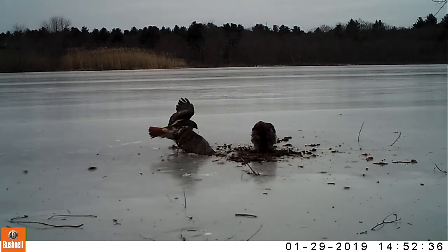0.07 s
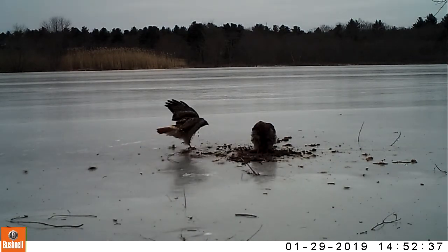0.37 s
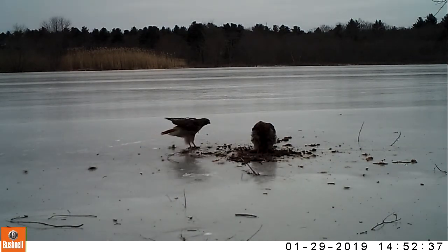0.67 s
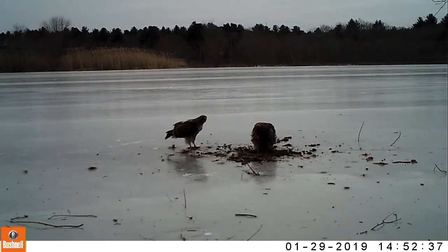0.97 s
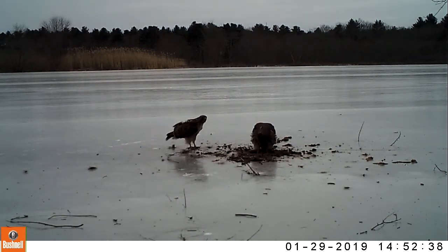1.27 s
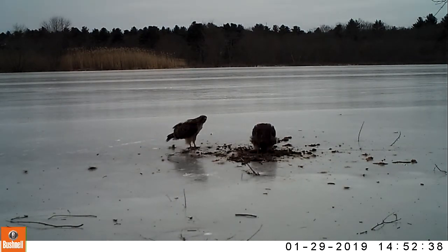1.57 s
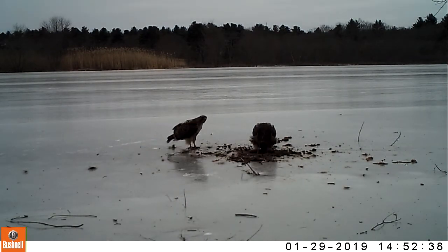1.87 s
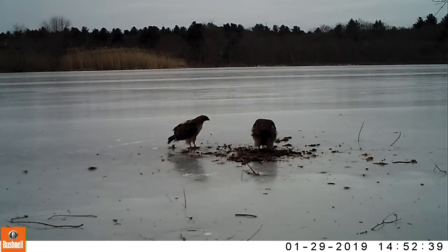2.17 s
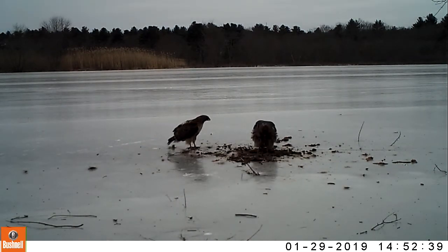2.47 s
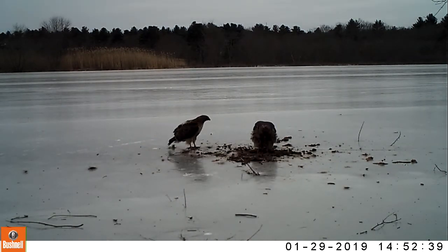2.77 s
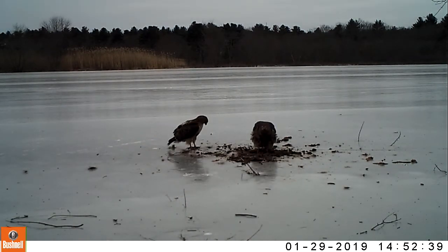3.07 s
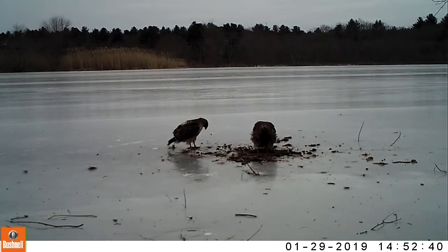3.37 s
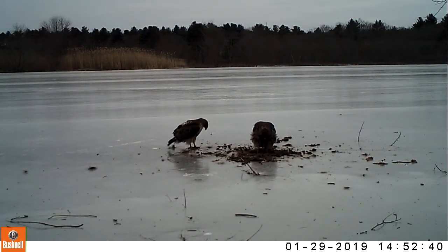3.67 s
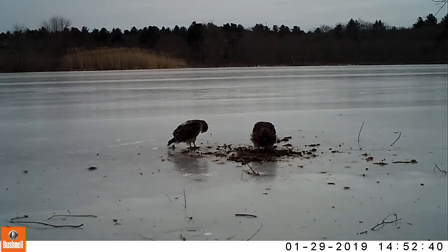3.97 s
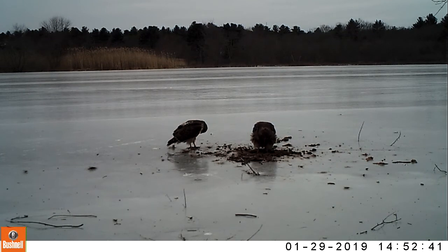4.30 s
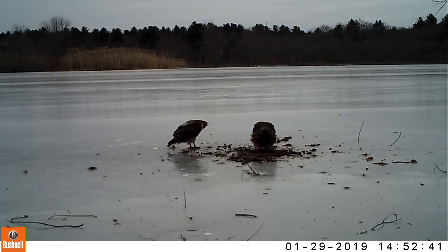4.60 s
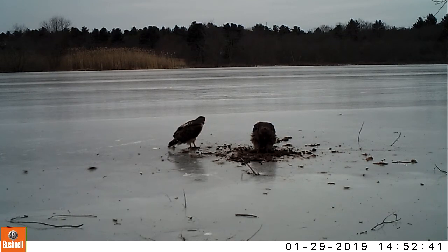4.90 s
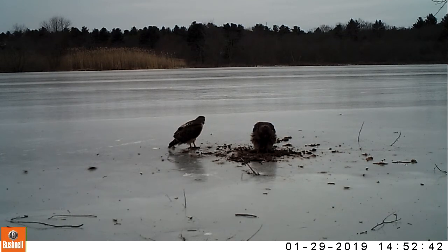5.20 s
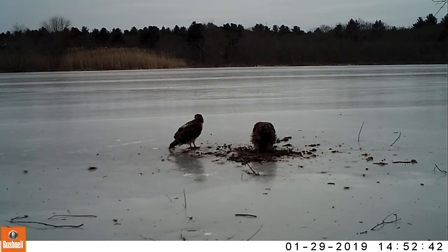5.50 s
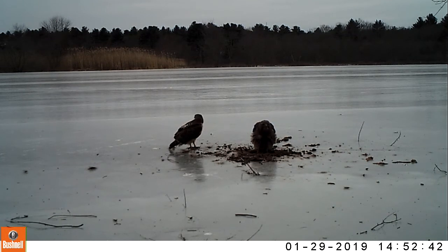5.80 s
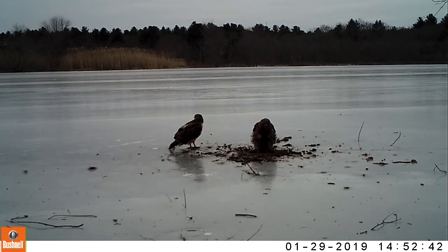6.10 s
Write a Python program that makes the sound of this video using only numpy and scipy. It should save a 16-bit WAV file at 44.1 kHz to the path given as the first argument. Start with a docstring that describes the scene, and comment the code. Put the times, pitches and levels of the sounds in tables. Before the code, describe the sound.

Low wind buffets a small microphone beside a frozen lake, with soft hiss, far wind in the woods and a low, fluttering electrical buzz throughout. After two barely audible feather brushes, a hawk whistles four times, high and thin, each call rising and then dropping quickly, the third slightly raspy. The calls scatter faintly off the ice. The second half holds only gusts and background noise.

```python
"""Wind buffets the microphone of a trail camera, over a distant roar, amplifier hiss and the buzz of
circuits pulsing at the frame rate. On a frozen lake a hawk folds its wings with two soft swishes,
then gives four thin, arching whistles, each a gliding tone filtered by its throat.
The calls scatter faintly back from the ice and from reeds and trunks."""
import sys
import numpy as np
from scipy import signal
from scipy.fft import rfft, irfft
from scipy.io import wavfile
from scipy.ndimage import uniform_filter1d

SR = 44100
rng = np.random.default_rng(int(sys.argv[2]) if len(sys.argv) > 2 else 0)


def unload_audio(sound):
    """Save the sound as a 16-bit wav file, at the path given as the first command line argument."""
    columns = np.transpose(np.atleast_2d(sound))
    # keep every value between -1 and 1, then stretch to whole-number steps
    steps = np.round(np.clip(columns, -1, 1) * 32767)
    wavfile.write(sys.argv[1], SR, steps.astype(np.int16))


N = 275625
TIME = np.arange(N) / SR
FREQS = np.fft.rfftfreq(N, 1 / SR)


def amp(db):
    """Amplitude ratio for a level in decibels."""
    return 10 ** (np.asarray(db) / 20)


def unit(x):
    """Normalisation to an rms of 1."""
    return x / np.sqrt(np.mean(x ** 2) + 1e-20)


def level_at(spectrum, hz):
    """Interpolation of a spectrum on a logarithmic frequency axis."""
    f, db = np.transpose(spectrum)
    return np.interp(np.log(hz + 1), np.log(f + 1), db)


def noise(density):
    """Gaussian noise with the given spectral density, in amplitude per root Hz."""
    return irfft(rfft(rng.standard_normal(N)) * density, N) * np.sqrt(SR / 2)


def wander(rate_hz):
    """Random fluctuation of rms 1, band-limited to about the given rate."""
    return unit(noise(1 / (1 + (FREQS / rate_hz) ** 4)))


def bump(at, length):
    """A Gaussian envelope of height 1."""
    return np.exp(-(2 * (TIME - at) / length) ** 2)


def wind(breeze_db=(-57, -64), rumble_gain_db=1.5, eddy_gain_db=1.0, eddy_hz=52):
    """Turbulence at the microphone: breeze and gusts add in power, as deep rumble and smaller eddies."""
    # Each row: centre and length in seconds, relative levels of rumble and of eddies in dB.
    gusts = [(0.25, .16, -50, -57.5), (1.645, 0.14, -45.5, -70), (2.233, 0.097, -44.5, -56),
             (2.855, 0.51, -46.5, -82), (4.14, 0.22, -49.5, -60), (4.71, 0.29, -48.5, -53.5),
             (5.21, 0.17, -47, -64), (6.018, .16, -43.5, -58), (6.2, 0.25, -45.5, -48)]
    # Each row: frequency in Hz, relative spectral density of the rumble in dB.
    rumble_spectrum = [(3, 0), (9, 6), (20, -1.5), (33, -1), (50, -24), (100, -29.5), (400, -73.5),
                       (1500, -100)]
    power = amp(breeze_db)[:, None] ** 2  # rumble, then eddies
    for at, length, *levels_db in gusts:
        power = power + amp(levels_db)[:, None] ** 2 * bump(at, length)
    rumble = amp(level_at(rumble_spectrum, FREQS))
    eddies = 1 / (1 + 0.5 * (FREQS / eddy_hz - eddy_hz / (FREQS + 1)) ** 2) ** 2
    out = np.zeros(N)
    for shape, gain_db, strength in zip((rumble, eddies), (rumble_gain_db, eddy_gain_db), np.sqrt(power)):
        swirl = noise(shape)
        swirl /= np.sqrt(uniform_filter1d(swirl ** 2, SR // 5))  # levelled, so the gusts set the swell
        out += amp(gain_db) * strength * swirl
    return out


def roar_and_hiss(sway_db=0.53, crossover_hz=900):
    """Broadband noise: far wind in the woods sways in the bass, amplifier hiss holds in the treble."""
    # Each row: frequency in Hz, spectral density in dB.
    spectrum = [(10, -97.5), (60, -88), (110, -85.5), (160, -86.5), (250, -91), (500, -97.5), (1000, -104),
                (2000, -110), (4000, -115), (7000, -118), (10000, -118.7), (13500, -120.5)]
    density = amp(level_at(spectrum, FREQS))
    roar_share = 1 / (1 + (FREQS / crossover_hz) ** 2)
    roar = noise(density * np.sqrt(roar_share)) * amp(sway_db * wander(4.2))
    hiss = noise(density * np.sqrt(1 - roar_share))
    return roar + hiss


def circuit_buzz(frame_hz=29.936, duty=2 / 5, step_db=-52.5, corner_hz=660, droop_hz=8):
    """Crosstalk: the camera draws a pulse of current every frame, which leaks, rounded, into the sound."""
    current = ((TIME * frame_hz + .5) % 1 < duty) * 1.
    rounding = 1 / (1 + 1j * FREQS / corner_hz) ** 2 / np.sqrt(1 + (FREQS / corner_hz) ** 2)
    coupling = 1j * FREQS / (droop_hz + 1j * FREQS)
    return amp(step_db) * irfft(rfft(current) * rounding * coupling, N)


def wings(half_width_hz=900):
    """Friction of feather on feather gives brief swishes of band-limited noise."""
    # Each row: centre and length in seconds, centre frequency in Hz, peak level in dB.
    brushes = [(0.024, 0.06, 4020, -77.5), (0.222, .08, 4060, -79)]
    out = np.zeros(N)
    for at, length, hz, db in brushes:
        swish = unit(noise(1 / (1 + ((FREQS - hz) / half_width_hz) ** 2)))
        out += amp(db) * swish * bump(at, length)
    return out


def vocal_gesture(arch, drop_s, base_db, crescendo_db, fade_db):
    """Frequency and amplitude modulation: a call swells in, arches, and dies away as its pitch drops."""
    # Where the voice thins. Each row: centre and length in seconds, change of effort in dB.
    falters = [(1.548, 0.054, -25), (2.433, 0.029, -17), (2.54, .018, -11), (3.055, 0.017, 0)]
    end_hz, drop_curve, glide_s = 2740, 1.3, .004
    attack_s, attack_db, release_db = 0.025, -11, -13.5
    push_db, full_push_hz_per_s, ebb_s = 5.5, 22000, 0.018
    times, pitch = np.transpose(arch)
    drop = np.clip((TIME - times[-1]) / drop_s, 0, 1)
    hz = np.interp(TIME, times, pitch) + (end_hz - pitch[-1]) * drop ** drop_curve
    hz = uniform_filter1d(hz, round(glide_s * SR))
    effort_db = base_db + np.interp(TIME, times[[0, -1]], [0, crescendo_db])
    effort_db += attack_db * np.clip(1 - (TIME - times[0]) / attack_s, 0, 1)
    effort_db += fade_db * drop + release_db * drop ** 4
    # A falling pitch lets out a push of air, which then ebbs.
    falling = np.clip(-np.gradient(hz) * SR / full_push_hz_per_s, 0, 1)
    ebb = np.exp(-1 / (ebb_s * SR))
    effort_db += push_db * signal.lfilter([1 - ebb], [1, -ebb], falling)
    effort_db += sum(db * bump(at, length) for at, length, db in falters)
    voicing = uniform_filter1d(((TIME > times[0]) & (drop < 1)) * 1., size=150)
    return hz, effort_db, voicing


def whistle(hz, effort_db, voicing, bright_db):
    """Source and filter: membranes vibrate in a harmonic tone, which the throat filters almost pure."""
    # Each row: centre and length in seconds, rattle rate in Hz, depth from 0 to 1.
    rasps = [(2.595, .046, 190, .85), (3.08, .04, 330, .3)]
    # Each row: frequency in Hz, gain of the throat in dB.
    throat = [(4400, 2), (5000, -9), (5500, -5), (6400, -31), (7200, -32), (7900, -16.5), (8700, -18.5),
              (9400, -18), (10600, -20.5), (12400, -11), (13000, -41)]
    # Each row: harmonic number, level in dB against the fundamental before brightness and throat act.
    overtones = [(2, 1.5), (3, -6)]
    jitter, shimmer, strain, rattle_bend, pure_above_db = 0.0036, 0.11, .028, 0.022, -63
    hz = hz * (1 + jitter * wander(450))
    envelope = voicing * amp(effort_db) * (1 + shimmer * wander(300))
    for at, length, rattle_hz, depth in rasps:
        # Strained membranes go a little sharp and beat unevenly, shaking level and pitch.
        catch = depth * np.exp(-(2 * (TIME - at) / length) ** 4)
        beat_hz = rattle_hz * (1 + 0.4 * wander(160))
        rattle = catch * np.sin(2 * np.pi * np.cumsum(beat_hz) / SR)
        envelope = envelope * (1 + rattle)
        hz = hz * (1 + strain * catch - rattle_bend * rattle)
    phase = 2 * np.pi * np.cumsum(hz) / SR
    tone = amp(level_at(throat, hz)) * np.sin(phase)
    # Past a certain effort only the fundamental grows, so the tone gets purer.
    edge_db = bright_db - np.maximum(effort_db - pure_above_db, 0)
    for k, db in overtones:
        tone += amp(db + edge_db + level_at(throat, k * hz)) * np.sin(k * phase)
    return np.sqrt(2) * envelope * tone


def lakeside(call, scatter_db, ice_t60=0.31, far_t60=.55, far_db=-5, build_s=0.0081):
    """Diffuse reflection adds a quick tail from the ice and a longer, duller one from reeds and trunks."""
    t, out = TIME[:SR], call
    for t60, db, cutoff_hz in ((ice_t60, scatter_db, 4200), (far_t60, scatter_db + far_db, 3500)):
        response = rng.standard_normal(SR) * amp(-60 * t / t60) * (1 - np.exp(-t / build_s))
        tail = signal.fftconvolve(call, amp(db) * response / np.linalg.norm(response))[:N]
        out = out + irfft(rfft(tail) / np.sqrt(1 + (FREQS / cutoff_hz) ** 16), N)
    return out


def hawk():
    """Four calls, coloured by directivity: turned aside, the hawk sounds duller and more reverberant."""
    # Pitch of each call up to its closing drop; the second and third flip up into a break.
    # Each row: time in seconds, pitch in Hz.
    arch_1 = [(0.74, 3139), (0.77, 3503), (0.816, 4040), (0.83, 4120), (0.862, 4695), (0.87, 4754),
              (0.884, 4561), (0.898, 4802), (0.914, 4619), (0.948, 4700), (0.96, 4534)]
    arch_2 = [(1.44, 2845), (1.456, 3170), (1.472, 3349), (1.506, 4140), (1.538, 5720), (1.558, 6370),
              (1.568, 5839), (1.578, 4570), (1.586, 4300), (1.598, 4230), (1.628, 4720), (1.635, 4660)]
    arch_3 = [(2.323, 3110), (2.385, 4053), (2.417, 5230), (2.443, 5500), (2.463, 4492), (2.475, 4420),
              (2.497, 4510), (2.517, 4880), (2.543, 4852), (2.612, 5260)]
    arch_4 = [(2.927, 3070), (2.943, 3378), (2.961, 3563), (2.977, 3630), (2.989, 3760), (3.021, 4710),
              (3.057, 4610), (3.077, 4847), (3.125, 4430)]
    # Each row: length of the drop in seconds, then in dB the base effort, crescendo,
    # fade during the drop, overtone brightness and scatter gain.
    calls = [(0.032, -63.5, 2, -2.5, -1, -12.5), (.044, -62.5, 1, -4, -3, -14.5),
             (.045, -68, 8.5, -2, -4, -8), (.043, -66.5, -4, -5, -4, -7.5)]
    out = np.zeros(N)
    for arch, (*shape, bright_db, scatter_db) in zip((arch_1, arch_2, arch_3, arch_4), calls):
        hz, effort_db, voicing = vocal_gesture(arch, *shape)
        out += lakeside(whistle(hz, effort_db, voicing, bright_db), scatter_db)
    return out


def scene():
    """Superposition of all sources in one channel."""
    return (hawk() + wings() + wind() + roar_and_hiss() + circuit_buzz())[None]


def record(dry):
    """Band limiting: the camera's low-pass filter cuts the top treble; both ends fade briefly."""
    cutoff_hz = 13900
    low_pass = signal.firwin(511, cutoff_hz, window=("kaiser", 8), fs=SR)
    faded = dry * signal.windows.tukey(N, .002)
    return signal.oaconvolve(faded, low_pass[None], "same")


dry = scene()
out = record(dry)
unload_audio(out)
```